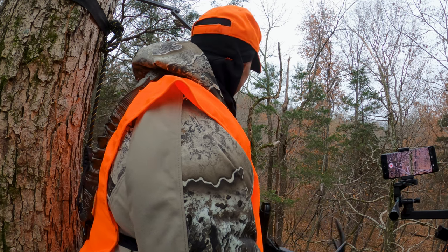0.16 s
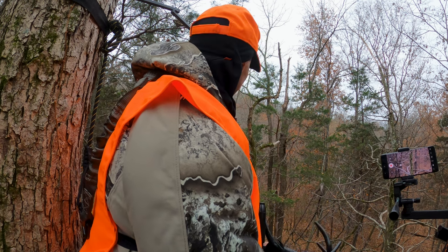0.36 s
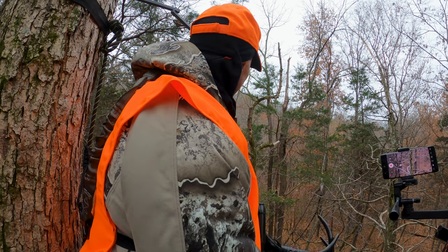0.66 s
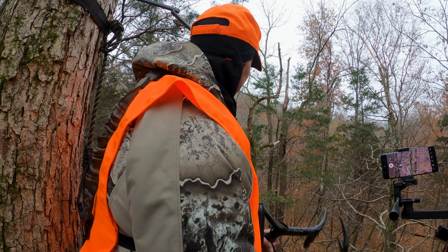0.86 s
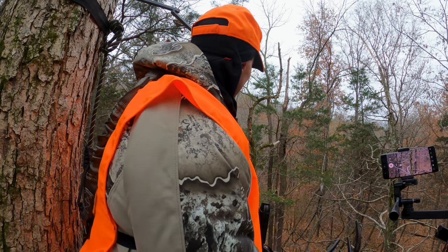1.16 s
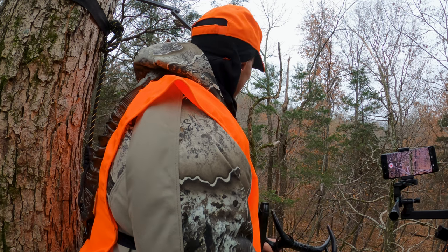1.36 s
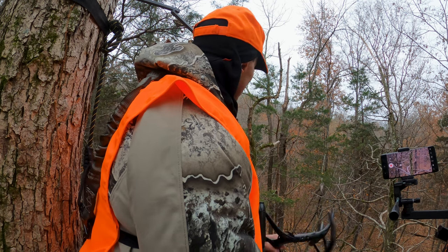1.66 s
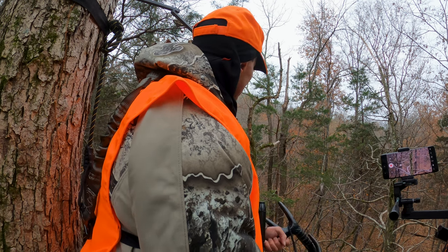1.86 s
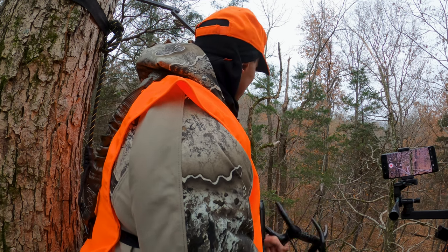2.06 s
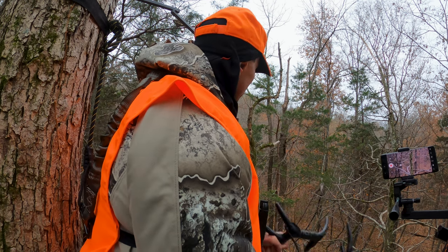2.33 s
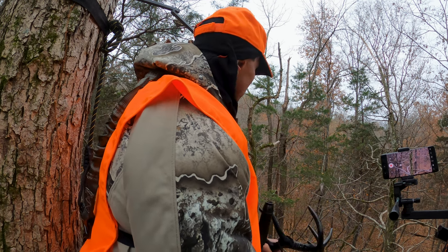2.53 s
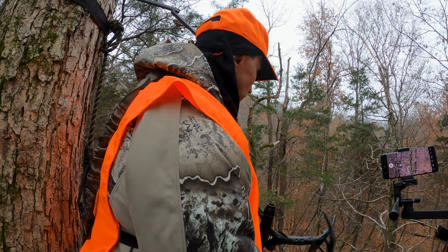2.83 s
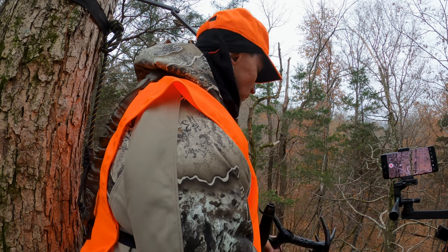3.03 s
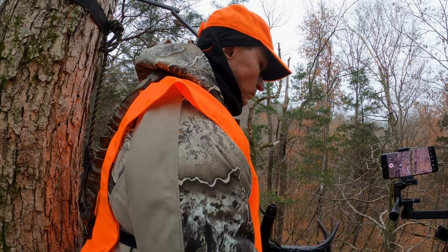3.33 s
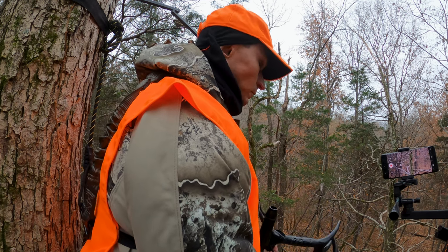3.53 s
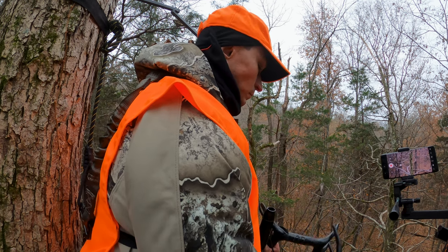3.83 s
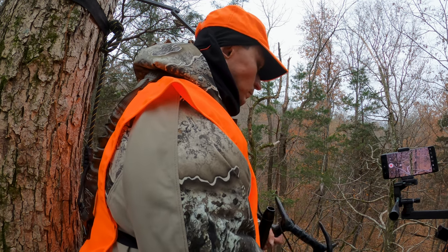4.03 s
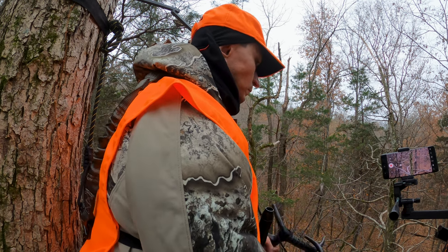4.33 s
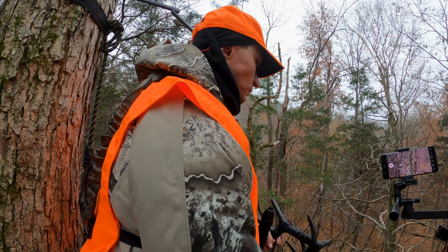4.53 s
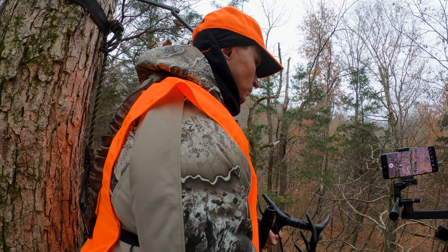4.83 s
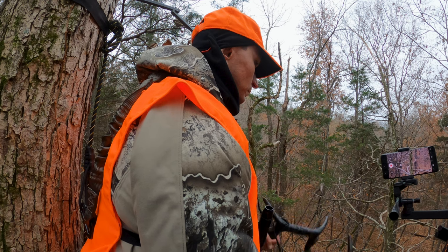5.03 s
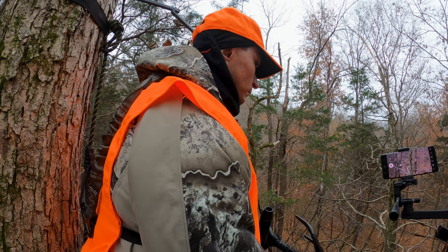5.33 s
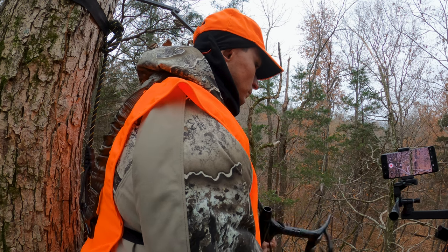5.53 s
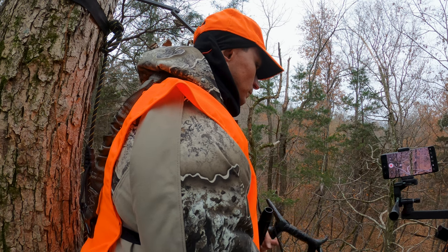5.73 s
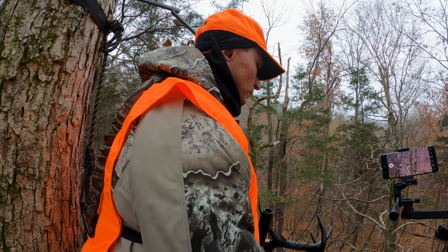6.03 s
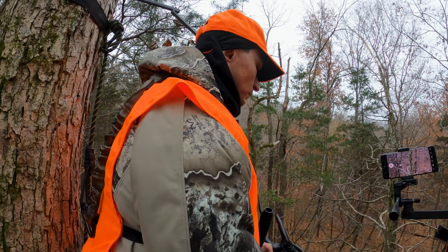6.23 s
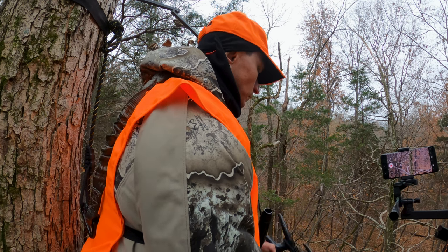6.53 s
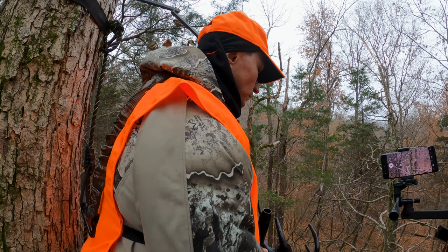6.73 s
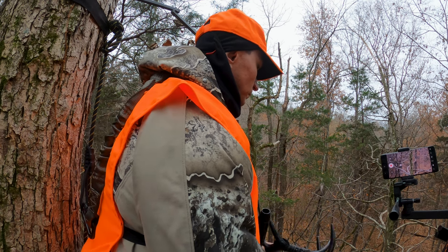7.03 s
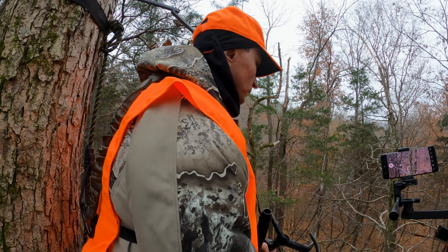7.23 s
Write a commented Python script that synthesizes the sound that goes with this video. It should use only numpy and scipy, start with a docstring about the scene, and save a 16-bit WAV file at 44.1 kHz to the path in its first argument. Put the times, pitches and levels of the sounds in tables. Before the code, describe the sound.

Close, dry rattling of hard antlers, sharp cracks, knocks and short scraping rasps in uneven bursts, echoing slightly among trees over a soft hush.

```python
"""A faint woodland hush with a low, far drone comes first; then two deer antlers are rattled by hand in bursts.
Tines slide as rows of tiny ridge taps with a hoarse squeak; clashes and knocks ring groups of fading bone modes.
Noise bursts make the dry cracks and the soft shudder of the tree stand; muffled tones make the dull bumps.
Nearby surfaces scatter the antlers quickly and the trunks blur them into an echo. Two close microphone ports
hear it all, with the antlers on their right."""
import sys
import numpy as np
from scipy import signal
from scipy.fft import rfft, irfft, next_fast_len
from scipy.io import wavfile
from scipy.ndimage import uniform_filter1d, map_coordinates

SR = 44100
rng = np.random.default_rng(int(sys.argv[2]) if len(sys.argv) > 2 else 0)


def wav_record(signal):
    """Record a signal, one row per channel, as 16-bit PCM in the file named by sys.argv[1]."""
    frames = np.transpose(np.atleast_2d(signal))
    bounded = np.clip(frames, -1, 1)
    # unit amplitude maps onto the largest positive 16-bit level
    quanta = np.round(bounded * 32767).astype(np.int16)
    wavfile.write(sys.argv[1], SR, quanta)


N = 325452  # length in samples


def amp(db):
    """Turn decibels into a gain factor."""
    return 10 ** (np.asarray(db) / 20)


def unit(x):
    """Scale x to an rms of 1."""
    return x / np.sqrt(np.mean(x ** 2) + 1e-20)


def along(points, hz):
    """Read a curve of (Hz, value) points at any frequency, on a logarithmic frequency axis."""
    point_hz, values = np.transpose(points)
    return np.interp(np.log(hz + 1), np.log(point_hz + 1), values)


def filtered(x, response):
    """Multiply the spectrum of x by a response given as a function of frequency."""
    n = x.shape[-1]
    padded = next_fast_len(n + 8192)
    spectrum = rfft(x, padded) * response(np.fft.rfftfreq(padded, 1 / SR))
    return irfft(spectrum, padded)[..., :n]


def noise(spectrum, shape):
    """Make coloured noise with an rms of 1."""
    white = rng.standard_normal(shape)
    return unit(filtered(white, lambda hz: amp(along(spectrum, hz))))


def add(track, s, sound):
    """Mix a sound into the track from time s (in seconds) on."""
    part = track[..., max(round(s * SR), 0):][..., :sound.shape[-1]]
    part += sound[..., :part.shape[-1]]


# Colour of the woodland hush, with the far drone near 150 Hz.
# Each row: frequency in Hz, relative strength in dB.
HUSH_COLOUR = [(25, -5.5), (60, -9), (108, -24), (150, 5.5), (190, -6), (350, -8.5), (460, -21), (750, -24),
               (1500, -20.5), (3000, -29.5), (6000, -32), (8000, -36), (11000, -44.5), (16000, -54)]


def air(level_db=-59.0, side_db=-10):
    """The hush of the woods and a far, steady drone: one coloured noise, nearly the same on both sides."""
    mid, side = noise(HUSH_COLOUR, (2, N))
    return amp(level_db) * (mid + amp(side_db) * np.array([side, -side]))


# Slides of bone on knurled bone: they slow as the tines lock and speed up as they part.
# Each row: start in seconds, end in seconds, level in dB before the layer's own level,
# final ridge rate in Hz, strength of the squeak over the rasp.
SCRAPES = [(0.16, .237, -37.5, 2213, .2), (0.405, 0.518, -50.5, 884, 0.72), (0.593, 0.66, -53.5, 1900, .2),
           (0.797, 0.829, -47, 1362, 0.69), (1.16, 1.272, -40.5, 1710, 0.27), (1.955, 2, -41.5, 2608, 0.23),
           (2.089, 2.156, -44, 493, 0.9), (2.175, 2.221, -44.5, 1378, 1.2),
           (2.288, 2.321, -53.5, 1263, 0.54), (2.628, 2.676, -41.5, 847, .6),
           (2.802, 2.861, -41.5, 3135, .2), (3.038, 3.067, -40, 786, .6), (4.031, 4.221, -46.5, 952, 0.74),
           (4.341, 4.424, -35.5, 1998, 0.22), (4.947, 5.024, -43.5, 1526, 0.5),
           (5.492, 5.558, -44, 2490, .3), (5.685, 5.743, -38.5, 987, .5), (5.846, 5.892, -43.5, 1097, 0.73),
           (5.897, 5.942, -38.5, 2006, 0.83), (6.158, 6.205, -30.5, 2070, 0.22),
           (6.235, 6.268, -39.5, 886, 0.99), (6.339, 6.424, -55, 3095, .1), (6.639, 6.685, -35.5, 2230, .4),
           (6.901, 6.94, -35.5, 1008, .5), (7.171, 7.251, -45.5, 718, .4), (7.32, 7.392, -43, 2990, 1.5)]
# Colour of one ridge slipping. Each row: frequency in Hz, relative strength in dB.
SLIP_COLOUR = [(100, -14.5), (500, 1), (900, 1.5), (2400, 5), (4000, -5.5), (6500, -20), (9000, -38),
               (15000, -47)]
START_RIDGE_HZ = 1000  # every slide sets off at this ridge rate


def scrapes(level_db=-2.0, size_db=4, slip_t60=0.0063, overtone_db=-9):
    """Ridges slip past at a gliding rate, each with a tiny tap; larger knurls make the rasp grainy."""
    track = np.zeros(N)
    t = np.arange(SR // 40) / SR
    jitter, hoarse = .22, .5  # uneven ridge spacing in ridges, roughness of the squeak
    catch_db, catch_rate = 4, 330  # depth in dB and rate per second of the larger knurls
    for start, end, db, last_hz, squeak_share in SCRAPES:
        offset, height, knurls, real, imag = rng.standard_normal(size=(5, 1024))
        n = round((end - start) * SR)
        knurl = [np.arange(n) * catch_rate / SR]
        ridges = np.cumsum(np.linspace(START_RIDGE_HZ, last_hz, n)) / SR  # ridges passed so far

        # Each ridge passed gives one tap of random size.
        passed = np.arange(int(ridges[-1]))
        at = np.interp(passed + jitter * offset[passed], ridges, np.arange(n)).astype(int)
        slips = np.bincount(at, amp(size_db * height[passed]), n)
        tap = noise(SLIP_COLOUR, len(t)) * amp(-60 * t / slip_t60)
        rasp = unit(signal.fftconvolve(slips - slips.mean(), tap)[:n])

        # The ridge rate is also heard as a hoarse pitch with one overtone.
        turn = np.exp(2j * np.pi * ridges)
        uneven = 1 + hoarse * (map_coordinates(real, knurl) + 1j * map_coordinates(imag, knurl))
        squeak = unit(np.real(uneven * (turn + amp(overtone_db) * turn ** 2)))

        swell = np.sqrt(np.abs(np.sin(np.linspace(0, np.pi, n))))
        pressure = swell * amp(catch_db * map_coordinates(knurls, knurl))
        slide = unit(pressure * (rasp + squeak_share * squeak))
        add(track, start, amp(db + level_db) * slide)
    return track


SNAGS_PER_S, SNAG_HZ = 39, 2106  # rate of the ticks along a slide, pitch they scatter around


def snags(level_db=1, scatter_db=3, scatter_oct=.6, t60=0.019, rise=0.00025):
    """Sliding tines snag on a knurl now and then; each tick rings a few modes."""
    track = np.zeros(N)
    t = np.arange(SR // 30) / SR
    for start, end, db, *_ in SCRAPES:
        for slot in np.arange(start, end - .5 / SNAGS_PER_S, 1 / SNAGS_PER_S):
            hz = SNAG_HZ * 2 ** (scatter_oct * rng.standard_normal(size=(7, 1)))
            modes = unit(np.sin(2 * np.pi * hz * t).sum(axis=0))
            tick = modes * (1 - np.exp(-t / rise))
            tick_db = db + level_db + scatter_db * rng.standard_normal()
            add(track, slot + rng.random() / SNAGS_PER_S, tick * amp(tick_db - 60 * t / t60))
    return track


# Single knocks while the tines are twisted and pulled apart.
# Each row: start in seconds, level in dB before the layer's own level, pitch in Hz, heft (arm weight) in dB.
KNOCKS = [(0.2118, -36.5, 2160, -3), (0.2183, -36.5, 2710, -6.5), (.349, -23, 1018, -5.5),
          (0.3662, -27, 2620, -2), (0.3931, -30.5, 2630, -2.5), (.459, -36.5, 1100, 1.5),
          (1.063, -32, 1674, -2.5), (1.151, -27, 2710, -6.5), (1.1739, -37, 2314, 8),
          (1.2162, -32, 2090, 9), (1.2518, -37, 2570, -7.5), (1.4464, -26.5, 2600, -3.5),
          (1.4965, -27.5, 2435, -6), (1.596, -23.5, 1634, -15), (1.6152, -22.5, 2466, -0.5),
          (1.6691, -24.5, 2970, -3.5), (1.705, -28.5, 2600, -7.5), (1.9637, -45, 1833, -19.5),
          (2.1069, -30, 840, -3), (2.5812, -36, 1900, 1.5), (2.5904, -35.5, 1740, -1),
          (2.843, -33, 2915, -8), (3.13, -41.5, 1790, -3), (3.2479, -33.5, 2010, -6.5),
          (3.3148, -25.5, 2900, -5.5), (3.336, -23.5, 3700, -4.5), (3.5073, -27, 2267, 6),
          (3.6036, -35.5, 1880, 3), (4.0235, -25.5, 1107, -3.5), (4.035, -31.5, 1396, 4),
          (4.1327, -41, 2790, 7), (4.225, -24.5, 2106, -2.5), (4.2687, -38.5, 2150, 6),
          (4.2805, -36.5, 2130, -2), (4.3086, -20.5, 2640, 0), (4.361, -41, 2560, 11),
          (4.401, -34.5, 3630, 6), (4.4662, -26, 4350, -7.5), (4.5074, -31.5, 1760, -15.5),
          (4.514, -28, 3800, -5), (4.5418, -28.5, 2300, 2.5), (4.64, -36, 1900, 9), (4.658, -30, 1000, 0.5),
          (4.8102, -24.5, 2194, 1.5), (4.9733, -34, 1190, 3.5), (4.99, -32.5, 3660, 5),
          (5.0048, -37.5, 2650, -1.5), (5.4653, -25, 3460, 1), (5.508, -38, 1730, 10.5),
          (5.5537, -39.5, 2860, -8), (5.718, -40.5, 2200, 3), (5.7981, -27, 2390, 0),
          (5.8113, -39.5, 1900, 1), (6.1581, -31, 2770, 12), (6.1765, -28.5, 2270, 5.5),
          (6.227, -33, 1210, 1), (6.451, -46, 2360, -9), (6.5194, -29.5, 2570, -5.5),
          (6.593, -23, 1227, -6), (6.6442, -28, 1460, -3), (6.6674, -41, 3500, 2),
          (6.6811, -34.5, 3830, -12), (6.848, -17.5, 2166, -0.5), (6.8989, -27, 1214, -3),
          (6.9046, -25.5, 2220, 3), (7.191, -31, 930, -1), (7.2953, -36, 3420, -7)]
# Full clashes: the tips meet, the beams catch a moment later, then settle against each other.
# Each row: start in seconds, level of the tips in dB, pitch of the tips in Hz, delay of the catch in seconds,
# level of the catch in dB, pitch of the catch in Hz, level of the settling in dB relative to the catch,
# heft of the catch in dB, shudder of the stand in dB. Each layer adds its own level to these.
CLASHES = [(0.3033, -21, 4110, .018, -22, 2700, -4.5, -1.5, -50),
           (1.0237, -20.5, 4000, .016, -19.5, 3790, -4, 5.5, -47),
           (1.381, -26, 4470, .018, -20.5, 2930, -12, 0, -52.5),
           (1.8081, -20.5, 4840, .0134, -29.5, 2934, -11, -6, -47.5),
           (2.498, -22.5, 4200, .0127, -18, 3576, -4.5, 2.5, -46.5),
           (2.9748, -22.5, 4120, .0151, -21, 3070, -1.5, 4, -58),
           (3.4574, -22, 3790, .0238, -22, 2780, -1.5, 1, -46.5),
           (3.9711, -20.5, 4700, .022, -22.5, 3850, 2, 6, -55),
           (5.2058, -22, 4450, .0142, -17.5, 2133, -18, 1, -76),
           (5.6746, -20.5, 4222, .018, -26.5, 2550, -13, -1, -50.5),
           (6.1055, -18.5, 4370, 0.015, -23.5, 5110, -3, 3.5, -42),
           (7.1201, -21.5, 4430, .038, -20, 2724, -3.5, 1, -69)]
TIP_HEFT_DB = -4.5  # the tips only glance off each other
SETTLE_S, SETTLE_PITCH = 0.011, 0.66  # settling: seconds after the catch, pitch as a share of the catch's


def contacts():
    """List each contact as (s, level dB, pitch Hz, heft dB): three for a clash, one for a knock."""
    rows = list(KNOCKS)
    for s, tip_db, tip_hz, delay, catch_db, catch_hz, settle_db, heft_db, _ in CLASHES:
        rows += [(s, tip_db, tip_hz, TIP_HEFT_DB),
                 (s + delay, catch_db, catch_hz, heft_db),
                 (s + delay + SETTLE_S, catch_db + settle_db, catch_hz * SETTLE_PITCH, heft_db)]
    return rows


# How a contact excites handle, beam, fork, tine and tip, in that order.
# Each row: centre in Hz, relative strength in dB, share of the heft, extra dB per dB of force.
REACH = [(291.6, 5, 1, 0.5), (970, -2, .4, 0), (2150, -0.5, -0.5, 0), (4200, -2, 0, 0), (6600, -6, 0, 0.44)]
FALL_DB_PER_OCT = 6.5  # zones far from the pitch of the contact answer less
FIRM_DB = -26  # table level of an ordinary firm contact; force is counted from here


def strike(db, hz, heft_db):
    """A contact favours zones near its pitch; force lifts handle and tip, heft mostly handle and beam."""
    centre_hz, reach_db, heft_share, growth = np.transpose(REACH)
    octaves_away = np.abs(np.log2(centre_hz / hz))
    zone_db = reach_db - FALL_DB_PER_OCT * octaves_away + growth * (db - FIRM_DB)
    zone_db = zone_db - 20 * np.log10(np.linalg.norm(amp(zone_db)))  # share out one total strength
    return db + zone_db + heft_share * heft_db


# Modes (natural tones) of the whole antler, used in every contact.
# Each row: frequency in Hz before a small random detune, strength in dB relative to others in its zone.
ANTLER = [(175, 6), (240, -10.5), (365, -10), (565, -24.5), (790, -2.5), (905, 1.5), (950, 6), (1104, -1),
          (1367, 4), (1660, 3.5), (1808, -8), (2088, 1.5), (2357, -1), (2488, 7.5), (2943, 3.5),
          (3466, -28.5)]
# Strength of the local modes, which depend on where the tines meet.
# Each row: frequency in Hz, strength in dB relative to others in its zone.
BONE = [(120, -23), (200, 2.5), (550, -12), (1000, 4), (2500, 12), (5000, 15), (6500, 4.5), (8000, -1.5),
        (10000, -11), (14000, -7.5)]
# How long local modes ring. Each row: frequency in Hz, time to fall by 60 dB in seconds.
DAMPING = [(150, 0.025), (500, 0.14), (1000, 0.035), (2200, 0.043), (4300, 0.016), (8000, 0.014),
           (14000, 0.0077)]
# Edges of the zones handle, beam, fork, tine and tip: a plain list in Hz.
ZONES = [135, 550, 1400, 3200, 5500, 15000]


def ring(zone_db, tine_hz, spread_db, swell, glint, tine_db, count=72):
    """One contact: whole-antler modes, fresh local ones and the struck tine, each zone at its own strength."""
    t = np.arange(SR // 7, dtype=np.float32) / SR
    low, high = np.sqrt([ZONES[0], ZONES[-1]])
    steps = (np.arange(count) + rng.random(count)) / count
    local_hz = np.append((low + (high - low) * steps) ** 2, tine_hz)
    local = np.c_[local_hz, along(BONE, local_hz)]
    hz, db = np.vstack([ANTLER, local]).T
    t60 = along(DAMPING, hz)
    t60[:len(ANTLER)] *= 1.9  # whole-antler modes outlast local ones
    hz = hz + rng.normal(0, 14.6, len(hz))  # the shifting grip detunes the bone a little
    db = db + np.append(rng.normal(0, spread_db, len(hz) - 1), tine_db)  # the struck tine stands out
    # Hard tip hits reach higher.
    db = db + glint * (zone_db[-1] + 46.5) * np.log2(np.maximum(hz / 7000, 1))
    size = amp(db) * rng.choice([-1, 1], len(hz))
    turn, fade, size = np.float32([2 * np.pi * hz, np.log(1000) / t60, size])[:, :, None]
    modes = size * np.sin(turn * t) * np.exp(-fade * t)
    zone = np.digitize(hz, ZONES[1:-1])
    parts = np.array([modes[zone == k].sum(axis=0) for k in range(len(zone_db))])
    parts *= 1 - np.exp(-np.outer(ZONES[1:], t) / swell)  # low zones build up more slowly
    return sum(amp(level) * unit(part) for level, part in zip(zone_db, parts))


def clacks(level_db=-8.5):
    """Every clash and knock of the two antlers, each contact ringing the bone briefly."""
    track = np.zeros(N)
    for s, db, hz, heft_db in contacts():
        zone_db = level_db + strike(db, hz, heft_db)
        add(track, s, ring(zone_db, hz, spread_db=5.0, swell=0.88, glint=0.4, tine_db=11.5))
    return track


KNOCK_SHUDDER_DB = -46.5  # added to a knock's level and heft, before the shudder's own level


def jolts(level_db=14, t60=0.12, rise=0.0054):
    """The blows pass through the arms into the stand, which shudders softly as low noise."""
    t = np.arange(SR // 2) / SR
    blows = [(s + delay, shudder_db) for s, _, _, delay, *_, shudder_db in CLASHES]
    blows += [(s, db + heft_db + KNOCK_SHUDDER_DB) for s, db, _, heft_db in KNOCKS]
    power = np.zeros(N)
    for s, db in blows:
        envelope = amp(db - 60 * t / t60) * (1 - np.exp(-t / rise))
        add(power, s, envelope ** 2)
    rumble = [(25, -8), (60, -4.5), (110, -6.5), (170, -3.0), (300, -29), (1000, -68.5)]  # (Hz, dB)
    mid, side = noise(rumble, (2, N))
    return amp(level_db) * np.sqrt(power) * (mid + 0.15 * np.array([side, -side]))


def nearby(x, level_db=-12, t60=0.049):
    """The seat, the bark and the hunter's body throw back a quick scatter, as short fading noise echoes."""
    t = np.arange(SR // 25) / SR
    scatter = rng.standard_normal((2, len(t))) * amp(-60 * t / t60) * (t > .001)
    scatter = scatter / np.linalg.norm(scatter[0])
    return amp(level_db) * signal.fftconvolve(x[None], scatter, axes=1)[:, :N]


# Colour of the echo from the trunks. Each row: frequency in Hz, strength in dB before the echo's own level.
ECHO = [(100, -10), (180, 4), (600, -10), (1200, -2), (2500, -3), (5000, -6), (8000, -7.5), (12000, -15)]
# How long the echo lasts. Each row: frequency in Hz, time to fall by 60 dB in seconds.
ECHO_T60 = [(150, 0.64), (1000, 0.86), (3000, 0.72), (6000, 0.72), (12000, 0.69)]


def woodland(x, echo_db=-20, build=0.002, side_db=-3):
    """Trunks scatter what the antlers send in all directions, so their modes blur into an even noise wash."""
    hz, t, z = signal.stft(x, SR, nperseg=256)
    power = uniform_filter1d(np.abs(z) ** 2, size=3, axis=0)
    t = t[t < 1]
    fade = amp(-60 * t / along(ECHO_T60, hz)[:, None]) ** 2 * (1 - np.exp(-t / build)) ** 2
    fade = fade / fade.sum(axis=1, keepdims=True)
    lingering = signal.fftconvolve(power, fade, axes=1)[:, :z.shape[1]]
    # Fresh noise takes on the lingering loudness of each frequency band.
    grain = signal.stft(rng.standard_normal((2, N)), nperseg=256)[2]
    colour = amp(echo_db + along(ECHO, hz))[:, None]
    wash = grain / grain.std() * np.sqrt(np.abs(lingering)) * colour
    mid, side = signal.istft(wash, nperseg=256)[1][:, :N]
    return mid + amp(side_db) * np.array([side, -side])


def cracks(level_db=6, t60=0.003):
    """The hard tips meet with a dry crack, a very short noise burst at the start of each clash."""
    track = np.zeros(N)
    t = np.arange(SR // 100) / SR
    colour = [(800, -17.5), (2200, -14), (4500, -2), (8000, 4), (15000, -12.5)]  # (Hz, dB)
    for s, db, *_ in CLASHES:
        burst = noise(colour, len(t))
        add(track, s + 0.00091, burst * amp(db + level_db - 60 * t / t60))
    return track


# Dull bumps of the beams inside the gloves.
# Each row: start in seconds, level in dB before the layer's own level, middle pitch in Hz.
BUMPS = [(.351, -39, 968), (2.125, -44.5, 580), (2.642, -36, 748), (3.049, -36.5, 820), (3.38, -42.5, 605),
         (4.329, -41, 686), (5.488, -40, 273), (7.228, -43, 479)]


def bumps(level_db=6, t60=0.049, rise=0.0012):
    """Soft contacts: each is one muffled cluster of six fading tones."""
    track = np.zeros(N)
    t = np.arange(SR // 10) / SR
    for s, db, hz in BUMPS:
        tone_hz = hz * np.exp(rng.normal(0, 0.13, size=(6, 1)))
        phase = rng.uniform(0, 2 * np.pi, size=(6, 1))
        cluster = unit(np.sin(2 * np.pi * tone_hz * t + phase).sum(axis=0))
        envelope = amp(db + level_db - 60 * t / t60) * (1 - np.exp(-t / rise))
        add(track, s, envelope * cluster)
    return track


# Phase of the left port against the right. Each row: frequency in Hz, lead in radians (negative lags).
LEAD = [(60, 1), (1000, 0.26), (2800, -1.08), (4200, -1.69), (7000, -1.76), (10000, -2.26), (15000, -2.2)]
# Loudness of the left port against the right. Each row: frequency in Hz, left minus right in dB.
BALANCE_DB = [(100, -1.5), (700, -1.5), (1300, -3), (2400, 0.5), (4400, -6), (8000, -0.5), (14000, -6.5)]


def ports(x):
    """The antlers are to the right: that port hears most pitches louder, and the higher ones sooner."""
    half = np.array([[.5], [-.5]])  # left and right share the difference equally
    return filtered(x, lambda hz: amp(half * along(BALANCE_DB, hz)) * np.exp(1j * half * along(LEAD, hz)))


def scene():
    """Antlers close by, their echoes, the shuddering stand and the quiet woods."""
    antlers = clacks() + cracks() + bumps() + scrapes() + snags()
    close = ports(antlers + nearby(antlers))
    return close + woodland(antlers) + jolts() + air()


# Tone of the microphones. Each row: frequency in Hz, gain in dB.
MIC = [(30, -6.5), (7500, 0), (10000, -7.5), (16000, -25)]
TOP_HZ = 16400  # nothing passes from here up


def record(dry):
    """The microphones soften the lowest and highest sounds and keep nothing above their band limit."""
    return filtered(dry, lambda hz: amp(along(MIC, hz)) * (hz < TOP_HZ))


dry = scene()
out = record(dry)
wav_record(out)
```